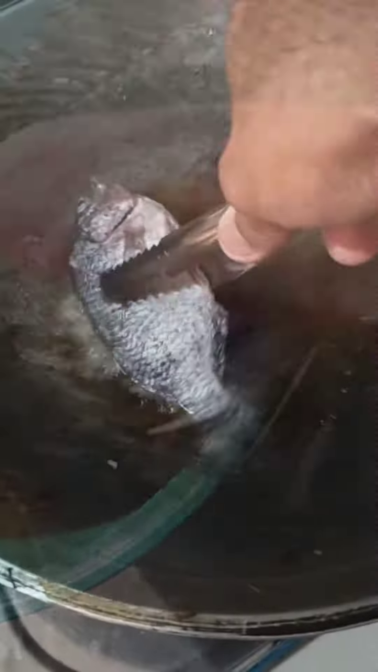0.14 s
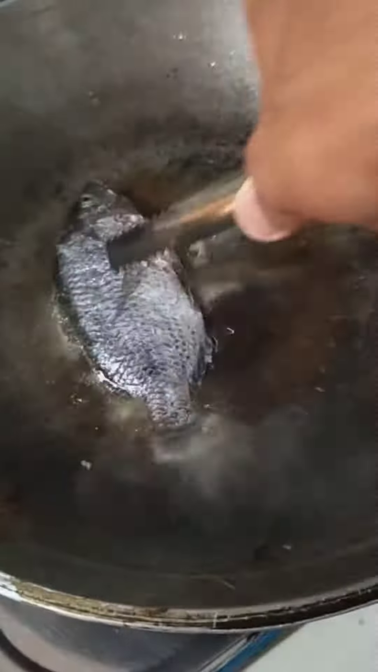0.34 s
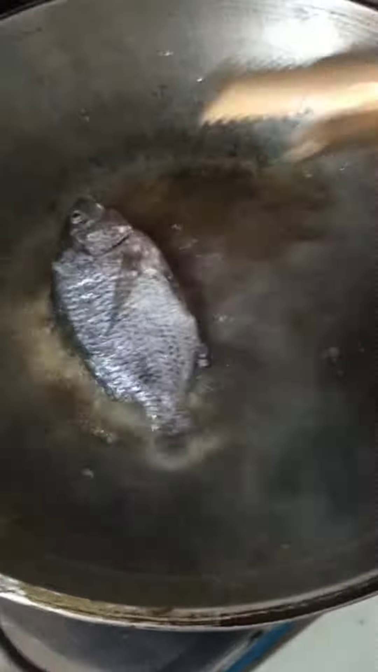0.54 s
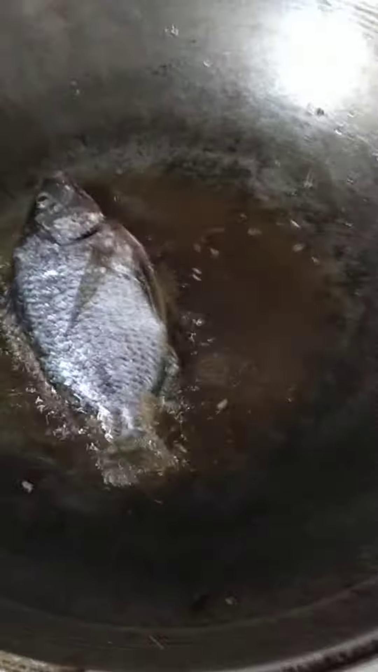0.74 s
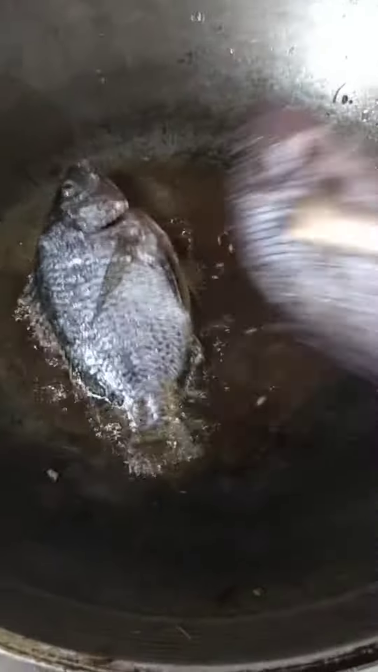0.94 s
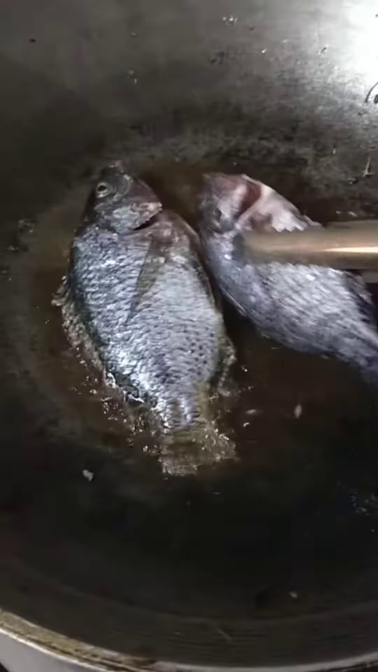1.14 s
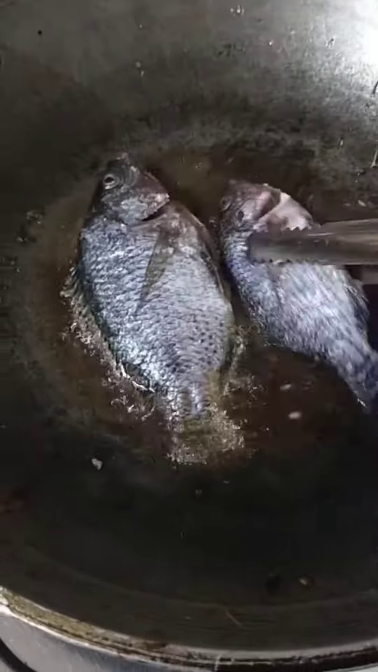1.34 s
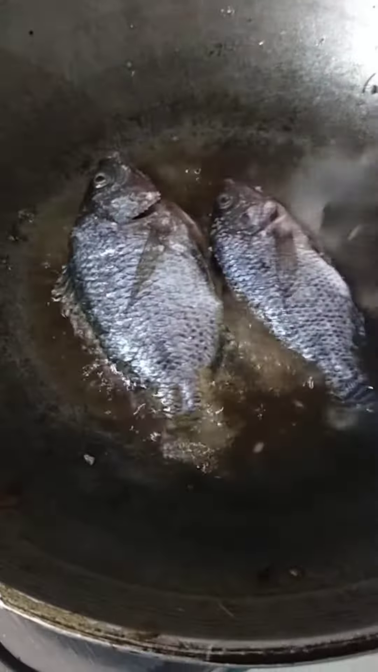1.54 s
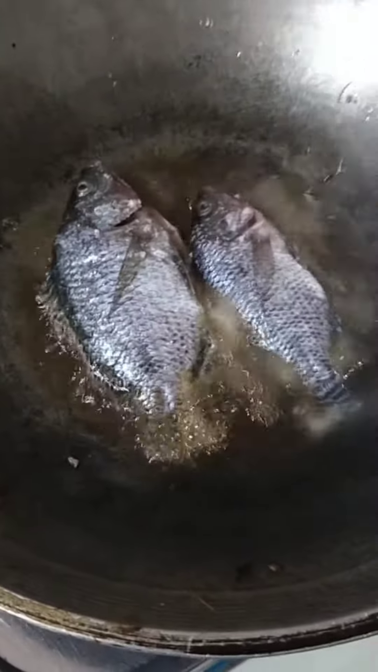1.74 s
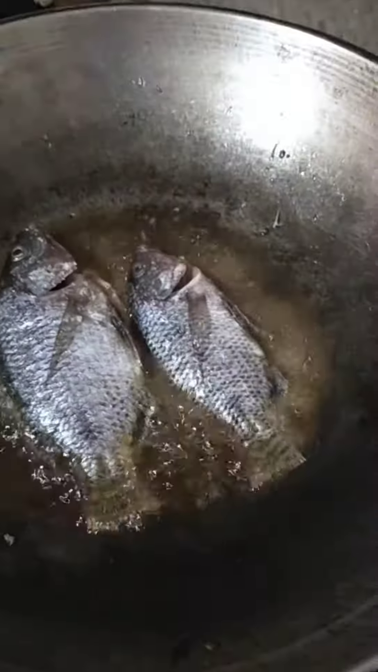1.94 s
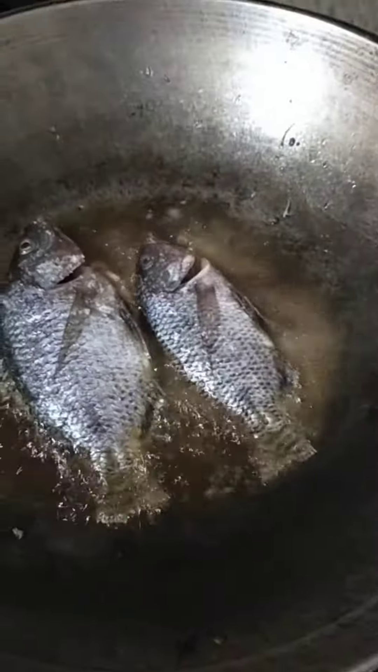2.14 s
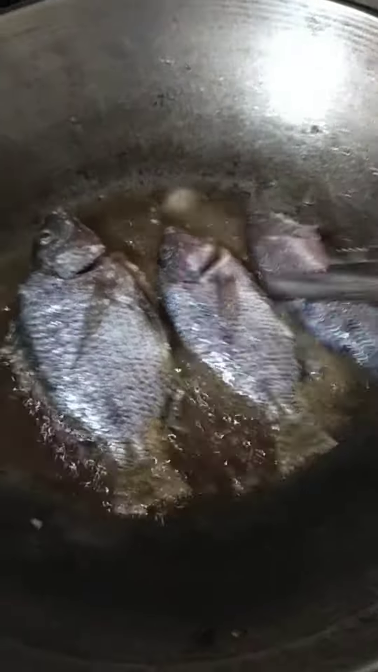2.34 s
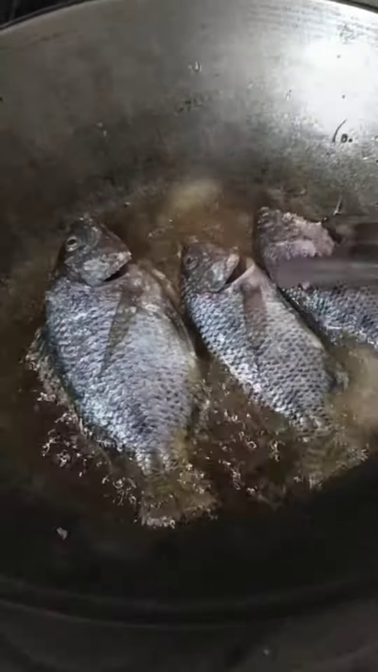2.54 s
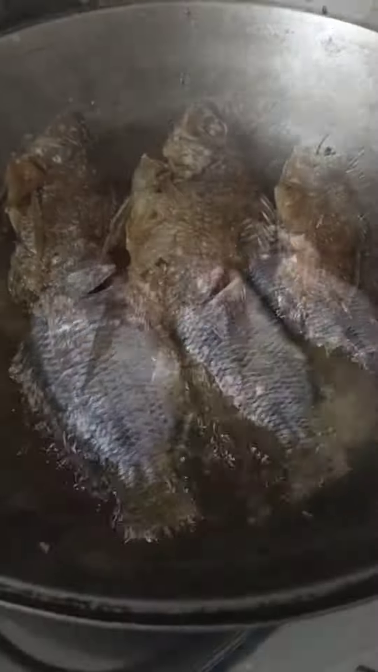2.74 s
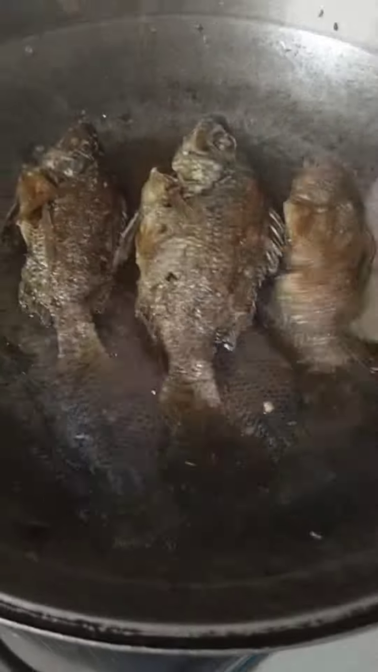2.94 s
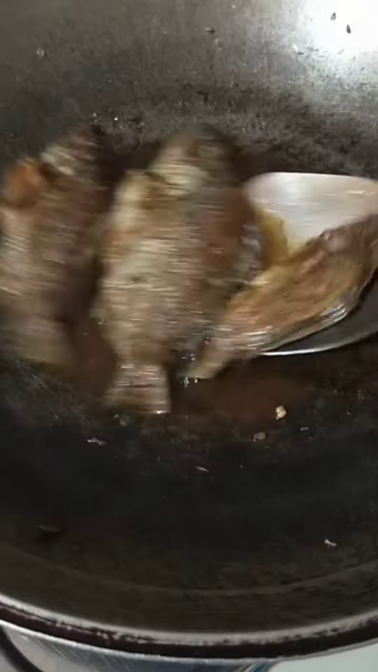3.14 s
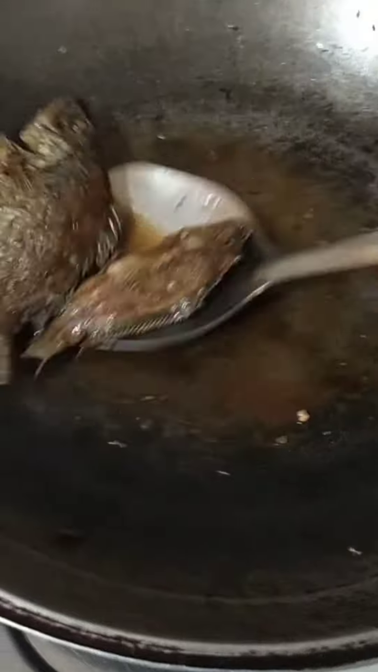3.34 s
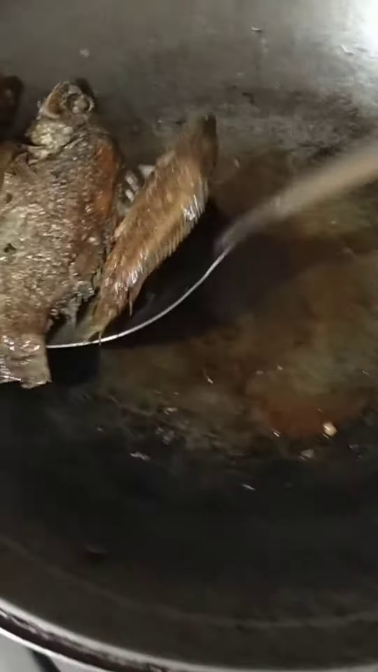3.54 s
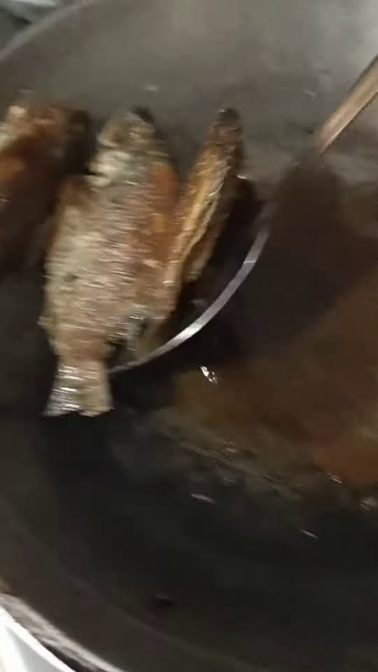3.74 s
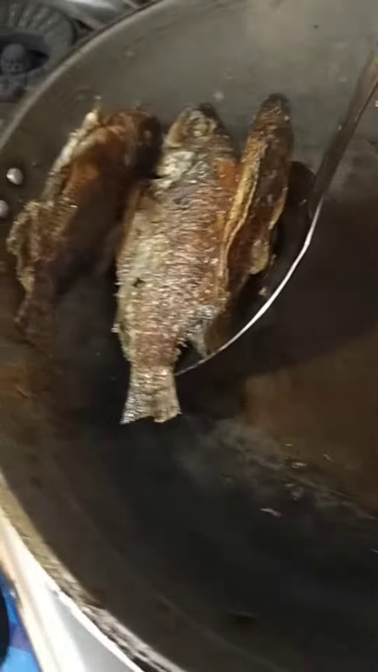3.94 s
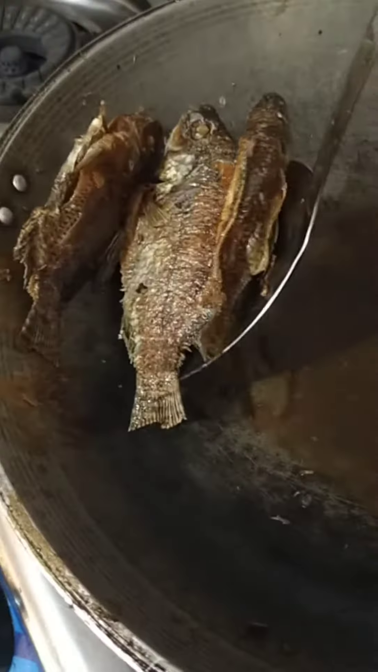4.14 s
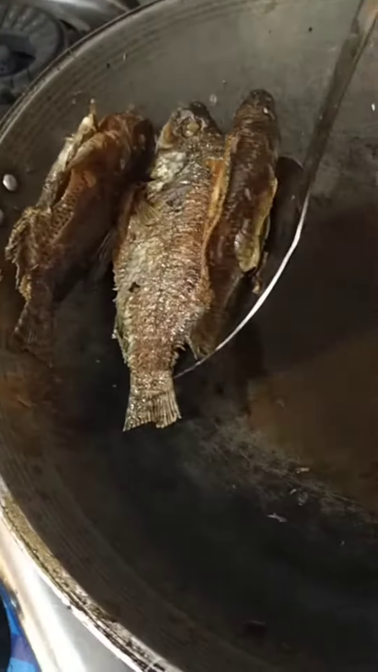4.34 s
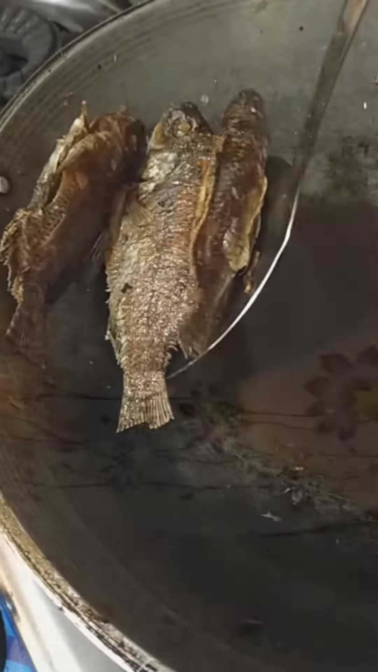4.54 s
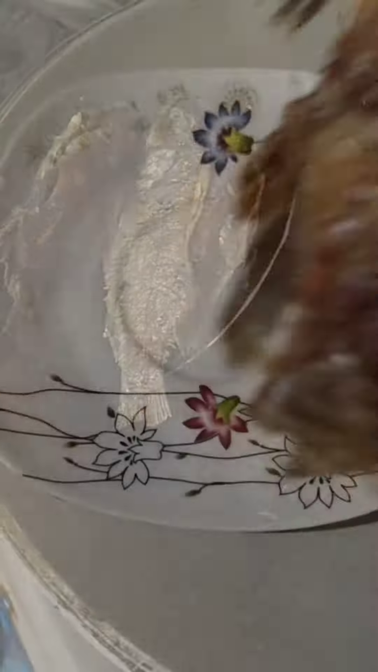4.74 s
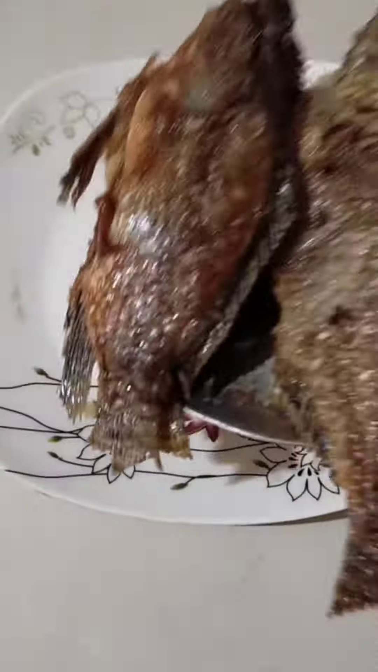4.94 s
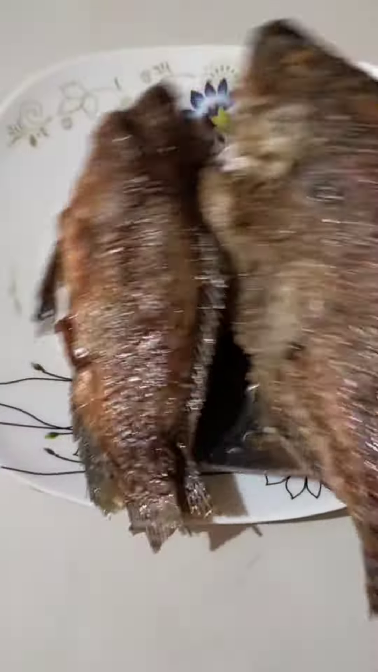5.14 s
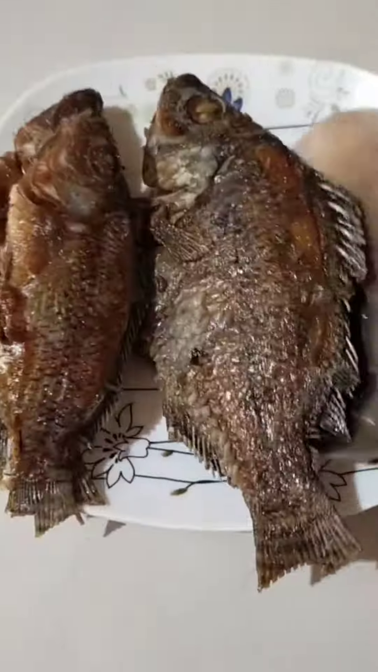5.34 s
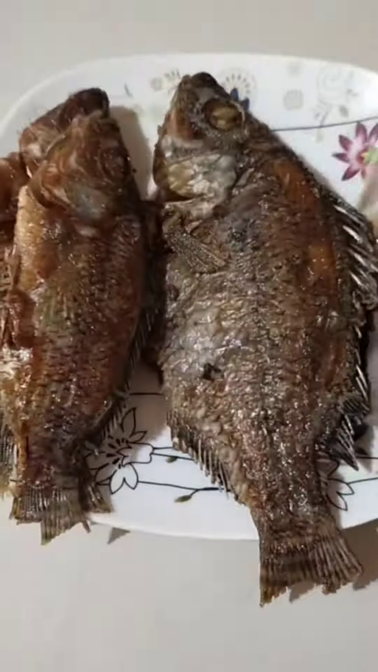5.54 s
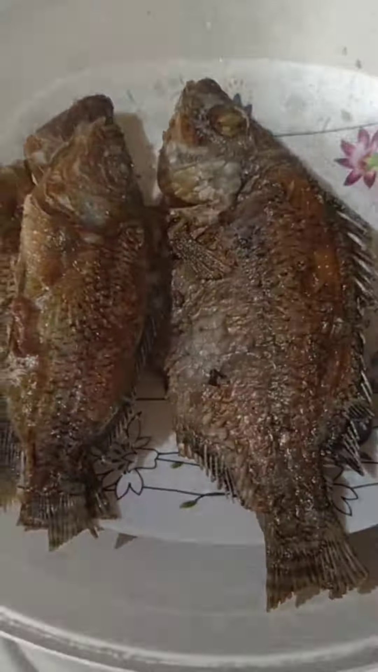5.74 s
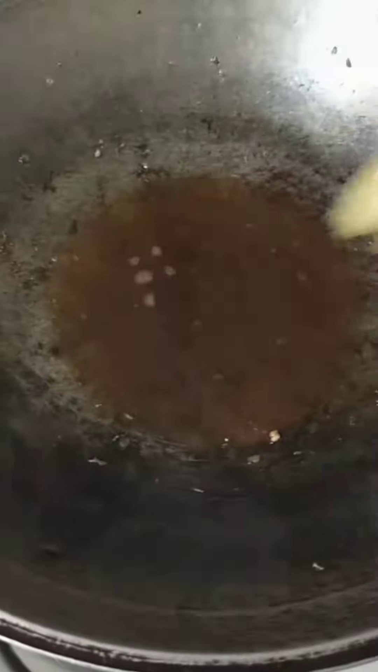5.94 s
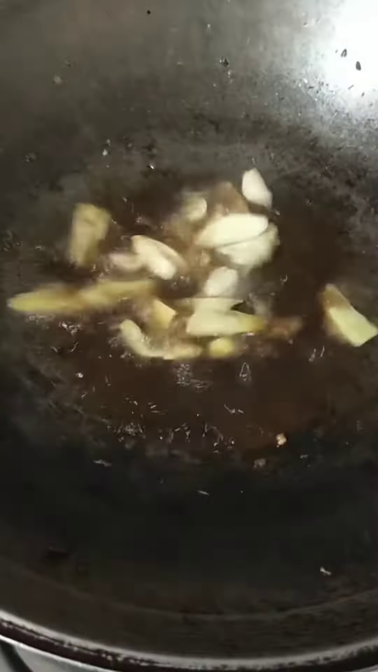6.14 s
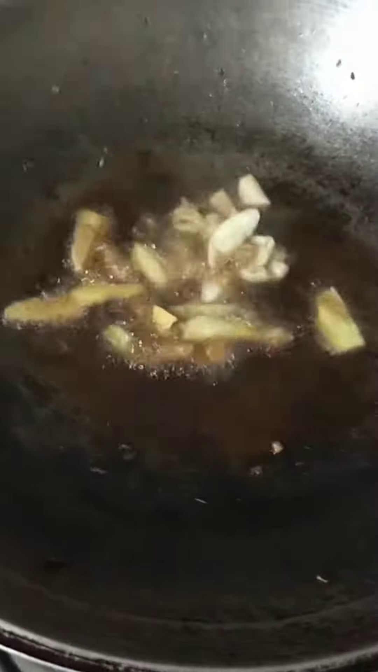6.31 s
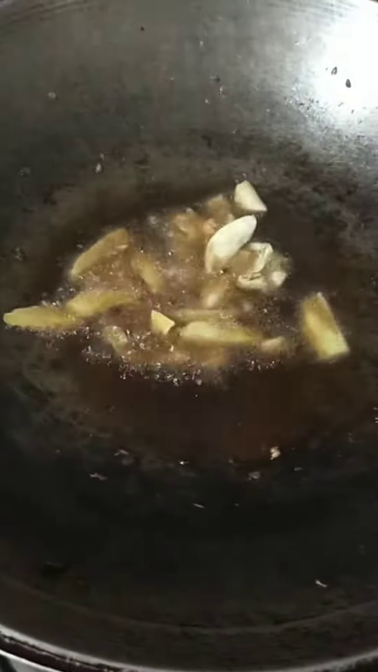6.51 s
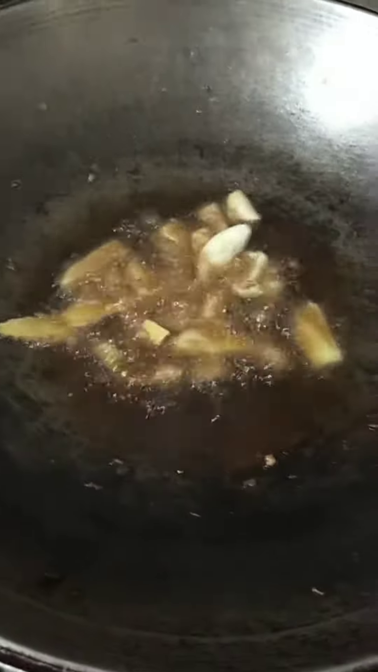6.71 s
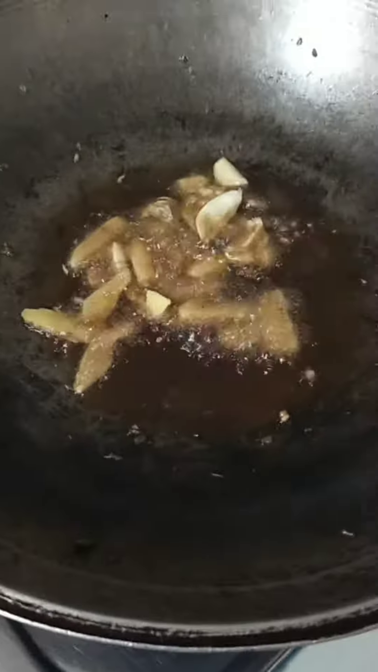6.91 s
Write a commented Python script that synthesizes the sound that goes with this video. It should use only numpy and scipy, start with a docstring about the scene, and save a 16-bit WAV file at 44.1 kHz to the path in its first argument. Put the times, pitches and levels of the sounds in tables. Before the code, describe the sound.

Close above a steel wok in a kitchen, fish goes into hot oil with a rushing sizzle and low puffs of steam against the microphone. The boil surges as more fish are added, with fat spitting and a spatula scraping. It thins to quiet crackle and pops, a plate knocks, near silence follows, then ginger fries loudly.

```python
"""Fish, then ginger, fries in a steel wok in a kitchen, heard from close above by one microphone.
Thousands of short bubble rings over steam hiss make the sizzle; drops of fat spit, and the bowl colours both.
Filtered noise makes steam jets, puffs that buffet the microphone, spatula scrapes and a low gas flame.
A struck set of modes makes the plate knock while the oil dies down, then ginger sets it off again.
Nine passages follow one another, with a brief drop in level between them."""
import sys
import numpy as np
from scipy import signal
from scipy.fft import rfft, irfft, next_fast_len
from scipy.io import wavfile

SR = 44100
rng = np.random.default_rng(int(sys.argv[2]) if len(sys.argv) > 2 else 0)


def unload_audio(sound):
    """Save the sound as a 16-bit wav file, at the path given as the first command line argument."""
    columns = np.transpose(np.atleast_2d(sound))
    # keep every value between -1 and 1, then stretch to whole-number steps
    steps = np.round(np.clip(columns, -1, 1) * 32767)
    wavfile.write(sys.argv[1], SR, steps.astype(np.int16))


N = 307377
T = np.arange(N) / SR  # time, s


def undb(db):
    """Decibels to gain."""
    return 10 ** (np.asarray(db) / 20)


def unit(x):
    """Scale to rms 1."""
    return x / np.sqrt(np.mean(x ** 2) + 1e-30)


def add(out, start_s, x):
    """Mix x in at a start time."""
    i = max(int(start_s * SR), 0)
    out[i:i + len(x)] += x[:max(N - i, 0)]


def colour(x, points):
    """Filter by a spectrum of (freq_hz, level_db) points, joined on a log-frequency axis."""
    size = next_fast_len(len(x) + 2048)
    hz, db = np.transpose(points)
    f = np.maximum(np.fft.rfftfreq(size, 1 / SR), 1)
    gain = undb(np.interp(np.log(f), np.log(hz), db))
    return irfft(rfft(x, size) * gain, size)[:len(x)]


def resonate(x, hz, width_hz):
    """One resonance, gain 1 at its centre."""
    hz = min(hz, SR * .45)
    b, a = signal.iirpeak(hz, hz / min(width_hz, SR / 4), fs=SR)
    return signal.lfilter(b, a, x)


def resonate_twice(x, hz, width_hz):
    """The same resonance in series, for steeper sides."""
    return resonate(resonate(x, hz, width_hz), hz, width_hz)


def walk(n, rate_hz):
    """Random wander with a spread near 1: straight lines between random knots."""
    place = np.arange(n) * rate_hz / SR
    count = int(place[-1]) + 2
    return np.sqrt(3 / 2) * np.interp(place, np.arange(count), rng.standard_normal(count))


def burst(decay_s):
    """A contact: noise of random signs that dies away with the given time constant."""
    t = T[:SR // 10]
    return rng.choice([-1, 1], len(t)) * np.exp(-t / max(decay_s, 1e-4))


def space(x, wet_db, t60_s=0.53, rise_s=0.0056):
    """Direct sound and the short kitchen tail: coloured noise that builds up, then decays."""
    t = T[:SR // 2]
    tail = rng.standard_normal(len(t)) * undb(-60 * t / t60_s) * (1 - np.exp(-t / rise_s))
    tail = colour(tail, [(200, 6), (4000, 0.0), (15000, -3)])
    response = undb(wet_db) * tail / np.linalg.norm(tail)
    response[0] += 1
    return signal.fftconvolve(x, response / np.linalg.norm(response))[:len(x)]


# resonances of the steel wok: freq_hz, width_hz, lift_db
BOWL_MODES = [(980, 44, 3.5), (1623, 180, 2), (1927, 174, 5), (2778.5, 67, 4.5), (3740, 80, 2),
              (4150, 110, 4.5), (4750, 110, 1), (6180, 150, 1.5), (7450, 160, 1), (7950, 340, 3.5),
              (8574.9, 350, 5.5), (14600, 450.64, 7)]


def bowl(x):
    """The wok lifts its own resonances."""
    return x + sum((undb(db) - 1) * resonate(x, hz, width) for hz, width, db in BOWL_MODES)


# spectrum of the burner and kitchen, before scaling to one level: freq_hz, level_db
BURNER_SPECTRUM = [(12, -35), (20, 8.5), (38, -4), (75, -4), (151, -13.5), (200, -9), (265, -22.5),
                   (321, -17), (500, -26), (650, -36), (1100, -120)]


def burner(level_db=-59):
    """The low, steady noise of the gas flame."""
    return undb(level_db) * unit(colour(rng.standard_normal(N), BURNER_SPECTRUM))


# puffs of steam on the microphone: start_s, length_s, level_db
STEAM_PUFFS = [(0.252, 0.1, -33), (0.369, 0.073, -32.5), (.445, 0.068, -27.5), (0.523, 0.046, -33),
               (0.568, 0.056, -30)]
# low bumps, the last a soft low thump as the final passage begins: start_s, pitch_hz, peak_db, length_s
LOW_BUMPS = [(0.403, 260, -33.5, 0.037), (.456, 277, -16.5, 0.03), (0.486, 281.9, -38, 0.051),
             (.596, 177, -31.5, 0.022), (1.412, 166, -42.5, 0.023), (5.303, 157.1, -47, 0.04),
             (6.08, 84.5, -47, 0.027)]


def buffets():
    """Each puff of rising steam swells and fades as a rumble on the microphone; low bumps are added."""
    spectrum = [(15, -2), (30, 5.5), (65, -1), (120, -1.0),
                (200, -16), (350, -24.5), (700, -67), (3000, -88)]
    rumble = unit(colour(rng.standard_normal(N), spectrum))
    swell = np.zeros(N)
    for start, length, db in STEAM_PUFFS:
        add(swell, start, undb(db) * np.sin(np.linspace(0, np.pi, int(length * SR))))
    out = swell * rumble
    for start, hz, db, length in LOW_BUMPS:
        n = int(length * SR)
        add(out, start, undb(db) * np.hanning(n) * np.sin(2 * np.pi * hz * T[:n]))
    return out


# spatula strokes in the wok and fish sliding onto the plate: start_s, length_s, level_db, centre_hz
SPATULA_SCRAPES = [(2.321, 0.02579, -27.5, 1230), (3.075, 0.024, -42, 1110), (3.136, 0.029, -34.5, 1630),
                   (3.388, 0.15, -49, 1250), (3.75, 0.022, -40.5, 1860), (4.39, 0.038, -47, 1584),
                   (4.795, 0.014, -45, 1720), (5.037, 0.018, -41, 1080), (5.13, 0.071, -53, 343),
                   (5.218, 0.026, -47.5, 4080), (5.267, 0.092, -59, 3800), (5.47, 0.041, -53.5, 890),
                   (5.875, 0.16, -58.5, 1500)]


def scrapes(wet_db=-9, slips_per_s=1600):
    """The blade sticks and slips over oily steel: sparse random slips through a broad resonance."""
    out = np.zeros(N)
    for start, length, db, hz in SPATULA_SCRAPES:
        n = int(length * SR)
        slips = rng.standard_normal(n) * (rng.random(n) < slips_per_s / SR) * np.hanning(n)
        add(out, start, undb(db) * unit(resonate_twice(slips, hz, hz * 1.326)))
    return space(out, wet_db)


# spatula and fish meeting the plate: start_s, level_db (all energy counted over 3 ms), contact_s
PLATE_KNOCKS = [(5.0466, -25, 0.0019), (5.0492, -22, 0.0018), (5.058, -48, 0.013), (5.141, -33, 0.01),
                (5.16, -31.5, 0.0087), (5.183, -33, 0.012), (5.227, -49, 0.0055), (5.312, -39.5, 0.0094)]
# resonances of the laden plate, against each other: freq_hz, width_hz, level_db
PLATE_MODES = [(163.7, 63, 0.5), (397, 140, -6), (720, 110, -4), (1030, 190, -7), (1894, 96.6, 7.5),
               (2010, 150, -1), (2605, 66, 4), (2820, 100, -11), (3030, 160, -4.5), (3880, 130, -5),
               (4200, 200, -8.5), (5000, 260, -7), (5830, 250, -11), (8600, 240, -3.5), (13000, 734, -17)]


def knocks(wet_db=-9, grit_db=-5, hard_s=0.0036):
    """Spatula and fish knock and drag on the plate, driving its modes."""
    out = np.zeros(N)
    for start, db, contact in PLATE_KNOCKS:
        # a short contact is a clean blow, a long one mostly grit from the crust
        push = undb(grit_db) * burst(contact) / np.sqrt(.001 * SR)
        push[0] += np.exp(-contact / hard_s)
        ring = np.zeros(len(push))
        for k, (hz, width, mode_db) in enumerate(PLATE_MODES):
            # neighbouring modes swing in opposite directions
            ring += (-1) ** k * undb(mode_db) * resonate(push, hz, width)
        add(out, start, undb(db) * ring / np.linalg.norm(ring) * np.sqrt(.003 * SR))
    return space(out, wet_db)


# dry ticks of crust and oil: start_s, relative_level_db (before the gain below)
CRUST_TICKS = [(3.3324, -37), (4.161, -25.5), (4.1742, -33), (4.32, -27), (4.5979, -37), (4.622, -38),
               (4.789, -41), (5.141, -39), (5.4303, -39), (5.6874, -41), (5.8636, -46)]


def ticks(decay_s=0.00062, wet_db=-10, gain_db=10):
    """Lone, tiny cracks as the crust cools: short bursts through a broad high resonance."""
    out = np.zeros(N)
    for start, db in CRUST_TICKS:
        crack = resonate(burst(decay_s), 8500, 9200)
        add(out, start, undb(db + gain_db) * crack / np.abs(crack).max())
    return space(bowl(out), wet_db)


def pop(hz, decay_s, width_share, echo_db, crack_db=-17, echo_s=0.0035):
    """A drop of water blows out of the fat: a pitched snap, a broad crack, and a scattered bowl echo."""
    push = burst(decay_s)
    lag = int(echo_s * SR)
    push[lag:] += undb(echo_db) * burst(0.0056)[:len(push) - lag]
    snap = resonate_twice(push, hz, hz * width_share)
    snap = snap + undb(crack_db) * resonate(push, hz, 9100)
    return snap / np.abs(snap).max()


# crackle of the draining fish: time_s, relative_level_db (before the gain below)
DRIP_CRACKLE = [(3.301, -62), (3.42, -39), (3.55, -42), (3.69, -35), (3.85, -32), (3.98, -39),
                (4.11, -36.5), (4.45, -50), (4.901, -51), (4.94, -57)]


def crackle(pops_per_s=130, scatter_db=5.5, low_hz=7000, high_hz=15000, wet_db=-14, gain_db=-2):
    """Juice drips from the lifted fish and bursts in small, separate, high pops."""
    out = np.zeros(N)
    s, db = np.transpose(DRIP_CRACKLE)
    span_s = s[-1] - s[0]
    for when, pitch, size in rng.random((int(pops_per_s * span_s), 3)):
        snap = pop(low_hz + pitch * (high_hz - low_hz), 0.0037, width_share=0.5, echo_db=-12.5)
        add(out, s[0] + when * span_s, undb(-scatter_db * np.log(size + 0.07)) * snap)
    out = space(bowl(out), wet_db)
    spread = out[(T > s[0]) & (T < s[-1])].std()
    return out / spread * undb(gain_db + np.interp(T, s, db))


# spitting fat: start_s, relative_peak_db (before the gain below), pitch_hz, decay_s
FAT_SPITS = [(1.0474, -13.5, 3780, 0.0027), (1.077, -19, 4110, .003), (1.101, -16.5, 4160, .003),
             (1.403, -12.5, 3800, .003), (2.763, -21, 3627, .003), (2.9054, -19, 4150, .002),
             (3.555, -14.5, 4420, 0.0094), (3.623, -22, 8870, .0033), (3.708, -13, 5150, 0.0027),
             (3.759, -29, 2400, .005), (3.805, -19, 5600, .003), (3.816, -20, 8400, 0.0049),
             (3.869, -24, 9900, 0.0031), (4.015, -19, 4240, 0.0079), (4.095, -23, 8280, 0.0026),
             (4.271, -21.5, 4650, 0.0098), (4.454, -34, 2730, 0.0022), (4.8335, -30, 6400, 0.0062)]


def spits(wet_db=-11, gain_db=0.5):
    """The loud pops of fat, which set the bowl ringing."""
    out = np.zeros(N)
    for start, db, hz, decay in FAT_SPITS:
        add(out, start, undb(db + gain_db) * pop(hz, decay, width_share=0.36, echo_db=-8.5))
    return space(bowl(out), wet_db)


# big bubbles bursting under the wet fish: start_s, relative_level_db (before the gain below)
STEAM_PLOPS = [(0.78, -30.5), (1.141, -29), (1.228, -27), (1.253, -31), (1.418, -22.5), (1.493, -28),
               (1.619, -42), (1.974, -29)]


def plops(hz=1250, width_hz=1300, decay_s=0.0059, wet_db=-10, gain_db=6):
    """Pockets of steam break out from under the fish with a dull splutter."""
    out = np.zeros(N)
    for start, db in STEAM_PLOPS:
        splutter = resonate_twice(burst(decay_s), hz, width_hz)
        add(out, start, undb(db + gain_db) * splutter / np.abs(splutter).max())
    return space(bowl(out), wet_db)


# steam forced out from under the food: start_s, length_s, level_db (before the swell), centre_hz, width_hz
STEAM_JETS = [(0.07, 0.17, -46, 2680, 300), (0.802, 1.3, -35, 2085, 269), (6.409, 0.18, -31, 3120, 800)]


def jets():
    """Steam escapes through narrow gaps: unsteady noise through a resonance, hoarse and sputtering."""
    out = np.zeros(N)
    for start, length, db, hz, width in STEAM_JETS:
        n = int(length * SR)
        sputter = rng.standard_normal(n) * undb(3.4 * walk(n, 100))
        steam = unit(resonate_twice(sputter, hz, width))
        add(out, start, undb(db) * steam * np.sin(np.pi * np.arange(n) / n))
    return out


def bubbles(n, rate, scatter_db, ring_s=0.00043):
    """Each bursting bubble is a very short ring with its own pitch, length and size."""
    when, pitch, life, size, phase = rng.random((int(rate * n / SR), 5)).astype(np.float32).T
    t = T[:96].astype(np.float32)
    hz = 300 + 15700 * pitch
    gain = undb(-scatter_db * np.log(size + 0.01))
    # ring times spread from 0.42 to 1.42 times ring_s
    decay = np.exp(-t / (ring_s * (0.42 + life[:, None])))
    tone = np.sin(2 * np.pi * (hz[:, None] * t + phase[:, None]))
    rings = gain[:, None] * decay * tone
    places = (when * n).astype(int)[:, None] + np.arange(len(t))
    return unit(np.bincount(places.ravel(), rings.ravel(), n)[:n])


# passages of frying: start_s, end_s, bubbles_per_s, size_scatter_db (per e-fold of chance),
# large_bubbles_db, fine_spray_db (both against the middling bubbles)
PASSAGES = [(0, 0.638, 17000, 1, -8, 1.5), (0.659, 2.425, 12900, 0.5, -6.5, 1.5),
            (2.471, 3.261, 14500, 1.5, -6, 1), (3.284, 4.469, 4900, 3, -2, 4),
            (4.514, 5.002, 3600, 4.5, -1.5, 2.5), (5.025, 5.584, 5300, 3.5, -0.5, 4.5),
            (5.628, 5.971, 5300, 4, 1.5, 6), (5.999, 6.072, 9000, 1.5, 8, 1),
            (6.093, 6.981, 14800, 1.5, -7.5, 3.5)]
# relative colour of the sizzle for each food: freq_hz, level_db
FIRST_FISH_COLOUR = [(200, -11), (550, -19.5), (1000, -12), (1400, -11), (2700, -5), (4100, -6), (5500, -9),
                     (8000, 0.5), (9600, -4.5), (10600, 0.5), (12300, -5), (15500, -1.5)]
WET_FISH_COLOUR = [(100, -23), (200, -20), (430, -23.5), (620, -17), (900, -7), (1300, -8), (2000, -3),
                   (3900, 2.5), (5800, -4.5), (8400, -3), (9600, -5.5), (10600, -5.5), (12500, -9.5),
                   (15500, -5.5)]
CRISP_FISH_COLOUR = [(150, -11), (550, -13.5), (1000, -9.5), (1900, -4), (2700, 3.5), (3200, 0.5),
                     (4700, 2.5), (6000, 1), (8500, 2), (9600, -6), (12500, 0), (15500, 4.5)]
IDLE_OIL_COLOUR = [(150, -14), (300, -2.5), (750, -11.5), (1800, -5.5), (4000, -15), (5500, -17.5),
                   (6800, -10.5), (8100, -9), (8600, -4), (9300, -11), (11400, -17), (12900, -9),
                   (15500, -7)]
GINGER_COLOUR = [(150, -29), (280, -23.5), (430, -26), (1050, -14), (1400, -14), (1900, -6.5), (2800, -2.5),
                 (4100, -3), (5500, -8), (6800, -6), (8700, -1.5), (10600, 0.5), (12500, -6), (15500, -2)]
# strength of the boil as the first fish goes in, more follow, and all three fry: time_s, level_db
FIRST_FISH_BOIL = [(0.005, -45), (0.013, -40.5), (0.199, -25), (0.207, -26), (0.509, -26.5), (0.531, -30),
                   (0.625, -24)]
MORE_FISH_BOIL = [(0.672, -23), (0.754, -24), (0.874, -29), (0.904, -24.5), (0.972, -36.5), (1.058, -26),
                  (1.204, -28.5), (1.252, -26), (1.364, -27), (1.402, -20), (1.466, -25), (1.524, -20.5),
                  (1.534, -24.5), (1.63, -20), (1.654, -23.5), (1.858, -28), (1.874, -21.5), (2.116, -25),
                  (2.396, -19.5), (2.412, -21)]
ALL_FISH_BOIL = [(2.483, -23.5), (2.573, -26.5), (2.601, -22.5), (2.679, -28), (3.101, -28), (3.109, -32),
                 (3.167, -34), (3.207, -24), (3.231, -28.5), (3.255, -40)]
# the oil dies down as fish is lifted out and served, one curve a passage: time_s, level_db
DYING_BOILS = [
    [(3.29, -41), (3.43, -37.5), (3.62, -45), (3.83, -38), (4.14, -43.5), (4.46, -43.5)],
    [(4.52, -46.5), (4.73, -52.5), (4.9, -50), (4.95, -57)],
    [(5.07, -51.5), (5.23, -47.5), (5.38, -53.5), (5.58, -52)],
    [(5.635, -58), (5.965, -53)],
    [(6.005, -66), (6.06, -67)],
]
# the boil under the ginger: time_s, level_db
GINGER_BOIL_CURVE = [(6.1, -26), (6.23, -23.5), (6.36, -33), (6.41, -29), (6.46, -31), (6.49, -24.5),
                     (6.7, -28), (6.74, -27.5), (6.84, -33.5), (6.87, -25.5), (6.96, -31)]
# rise for each dB of boil [dB per dB]: large bubbles, middling bubbles, fine spray
BOIL_SWINGS = (0.86, 1.11, 0.84)


def lowpass(x, hz):
    """Keep what lies below hz, without shifting it in time."""
    return signal.sosfiltfilt(signal.butter(6, hz, fs=SR, output="sos"), x)


def sizzle(hiss_db=-6, surge_db=1.63, flutter_db=1.08, churn_db=0.94, wet_db=-11):
    """Bubbles over steam hiss ring in the bowl, in flurries; a harder boil favours the middling ones."""
    out = np.zeros(N)
    foods = [FIRST_FISH_COLOUR, WET_FISH_COLOUR, WET_FISH_COLOUR, CRISP_FISH_COLOUR, CRISP_FISH_COLOUR,
             IDLE_OIL_COLOUR, IDLE_OIL_COLOUR, CRISP_FISH_COLOUR, GINGER_COLOUR]
    boils = [FIRST_FISH_BOIL, MORE_FISH_BOIL, ALL_FISH_BOIL, *DYING_BOILS, GINGER_BOIL_CURVE]
    for passage, boil, food in zip(PASSAGES, boils, foods):
        start, end, rate, scatter_db, large_db, spray_db = passage
        n = int((end - start + .02) * SR)
        oil = bubbles(n, rate, scatter_db) + undb(hiss_db) * rng.standard_normal(n)
        surging = oil * undb(surge_db * walk(n, 90))
        oil = colour(bowl(space(surging, wet_db)), food)

        large = lowpass(oil, 2400)
        below_spray = lowpass(oil, 6000)
        churning = large * undb(churn_db * walk(n, 39.6))
        fluttering = (below_spray - large) * undb(flutter_db * walk(n, 120))
        layers = (churning, fluttering, oil - below_spray)

        shares = undb([large_db, 0, spray_db])
        shares = shares / np.linalg.norm(shares)
        db = np.interp(start + T[:n], *np.transpose(boil))
        for layer, share, swing in zip(layers, shares, BOIL_SWINGS):
            level = undb(db.mean() + swing * (db - db.mean()))
            add(out, start, share * unit(layer) * level)
    return out


def scene():
    """Everything reaches one microphone close above the wok; both channels are alike."""
    frying = sizzle() + jets() + plops() + spits() + crackle() + ticks()
    mono = frying + scrapes() + knocks() + buffets() + burner()
    return np.array([mono, mono])


def record(dry, gap_db=-40, edge_db=-20, top_hz=15500):
    """The level drops between passages, and a steep low-pass cuts off the top."""
    live = sum((T >= start) & (T < end) for start, end, *_ in PASSAGES) > 0
    # each passage has faint, soft edges of a few milliseconds
    edges = signal.filtfilt([1 / (0.0019 * SR)], [1, -np.exp(-1 / (0.0021 * SR))], live * 1.)
    gate = np.maximum(live, undb(edge_db) * edges + undb(gap_db))
    return signal.sosfilt(signal.ellip(12, .2, 75, top_hz, fs=SR, output="sos"), dry * gate)


dry = scene()
out = record(dry)
unload_audio(out)
```